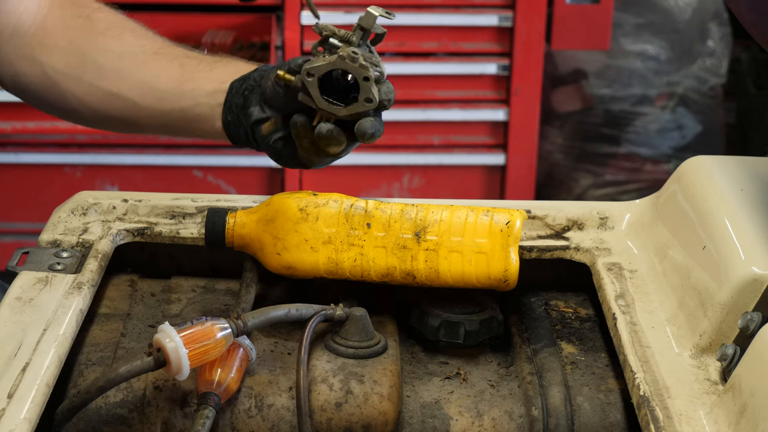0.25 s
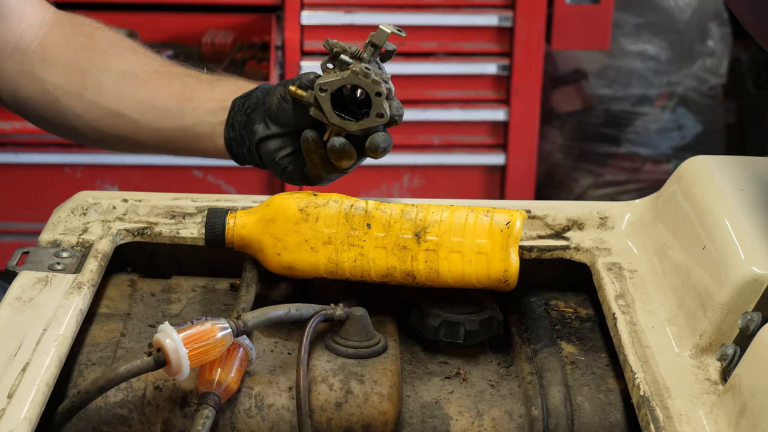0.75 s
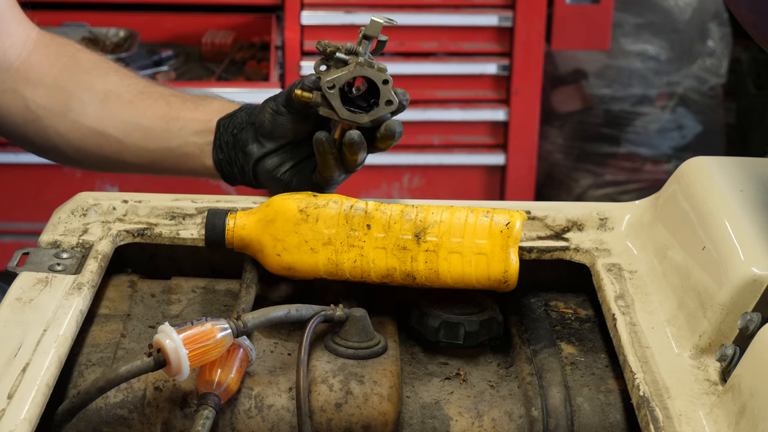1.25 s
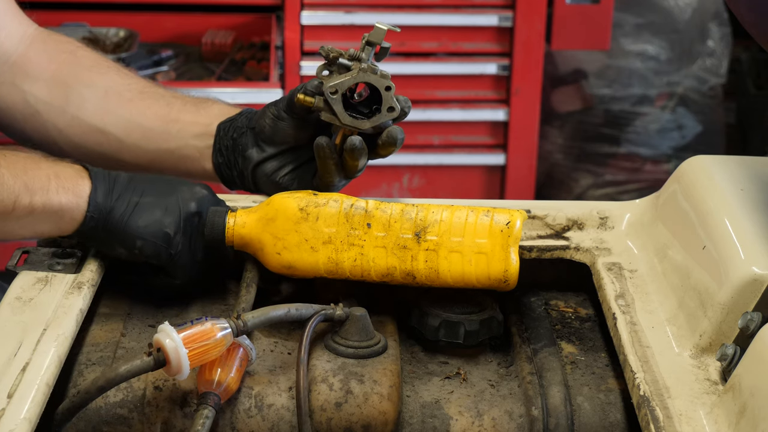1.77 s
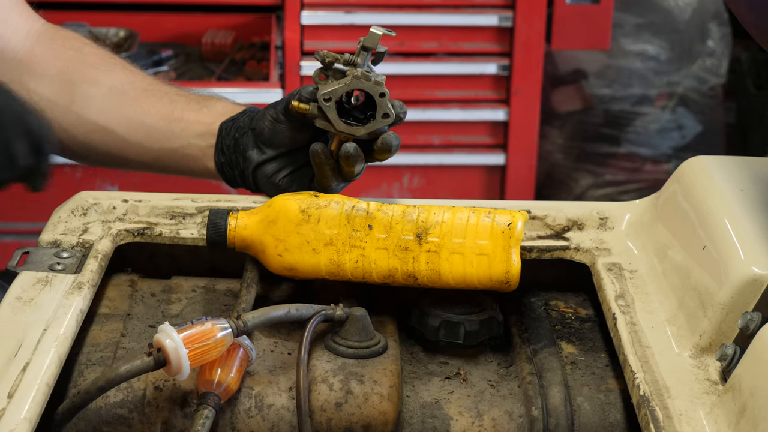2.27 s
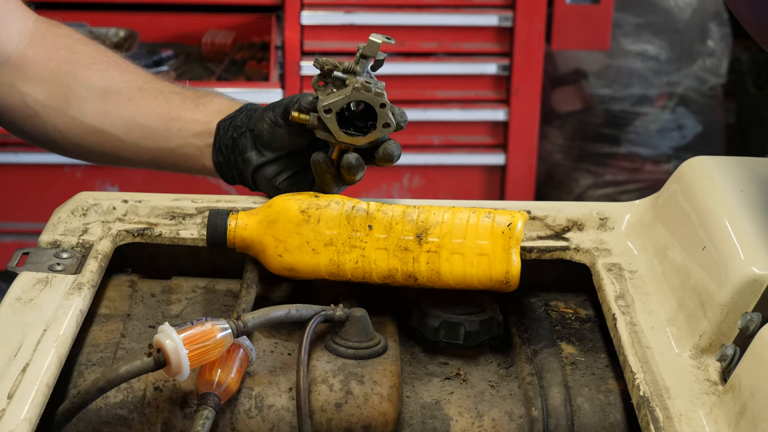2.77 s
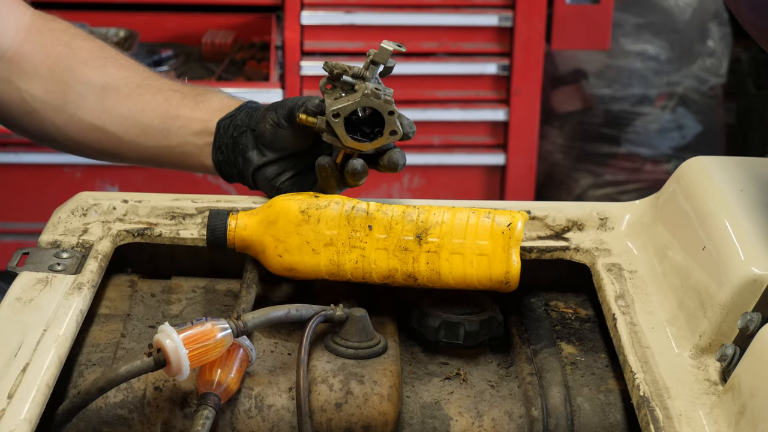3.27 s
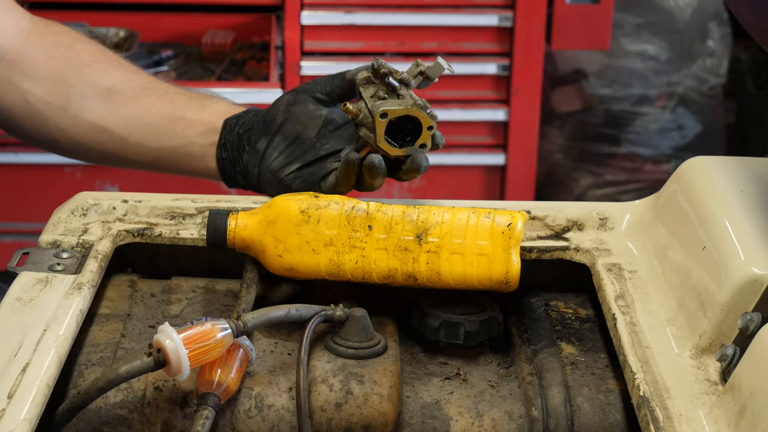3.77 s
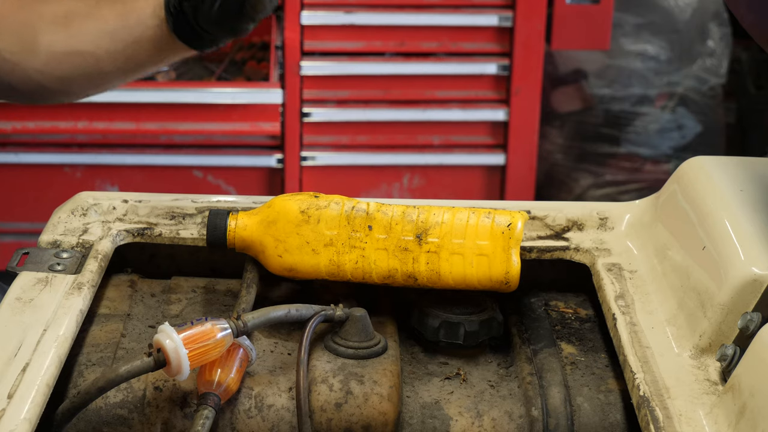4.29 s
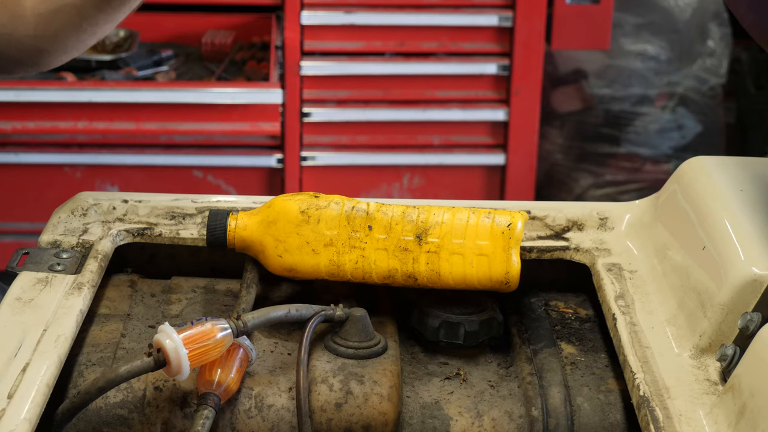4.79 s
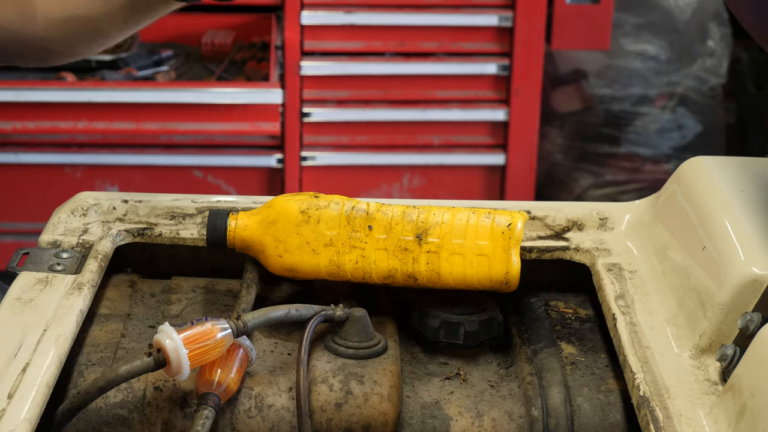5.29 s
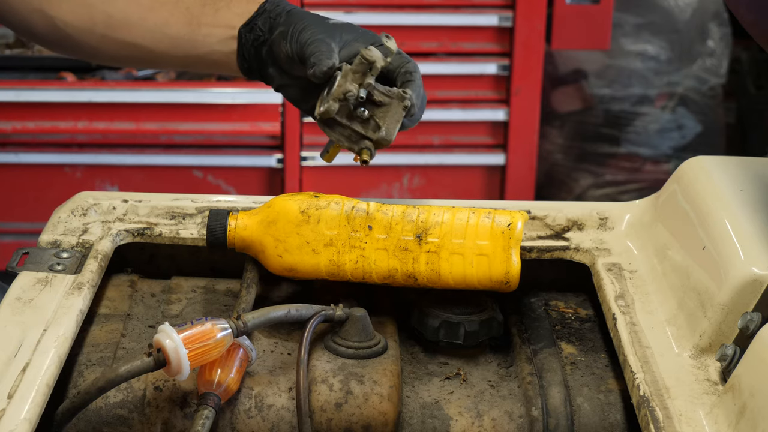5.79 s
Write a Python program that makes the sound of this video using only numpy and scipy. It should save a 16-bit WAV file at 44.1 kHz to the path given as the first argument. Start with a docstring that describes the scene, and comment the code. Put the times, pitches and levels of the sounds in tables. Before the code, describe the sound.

A workshop with its door open, close microphone, soft low hum throughout. Tiny bright screw ticks come at 0.06 to 0.26 s, the last clearest. At 0.4 s a tool is laid down with a hard clack and smaller knocks, then again at 0.6 s with a hollow plastic thump. Gloves begin to rustle faintly. At 1.28 s a clip snaps, extremely sharp and loud, followed by low hull thumps; a stronger, boomy one lands at 1.8 s among rubbery scrapes lasting to 2.3 s. After a lull, at 2.9 s a steel part clinks and bounces twice, ringing high, with a linkage tap and dull thump. Glove strokes rub softly from 3.2 s, with very faint knocks near 4 s. Distant birds, first heard faintly around 1.5 s, whistle more often after 3.4 s. At 5.4 to 5.6 s gloves scrape and the linkage rattles, strongest at the end; rustling and birds continue to 6 s.

```python
"""Workshop, door open: gloved hands strip a carburetor over a hollow plastic hull, close to the microphone.
Screw ticks come first, then a tool is laid down on the hull; gloves start to rustle, a clip snaps, the hull thumps.
Birds whistle far away from then on, a steel part clinks and bounces, and late on the linkage rattles.
Struck things are decaying sine modes with noise bursts; gloves are shaped noise, birds blurred sines.
The room hums quietly throughout and returns sparse reflections of all but the gloves and the hum."""
import sys
import numpy as np
from scipy import signal
from scipy.fft import rfft, irfft
from scipy.io import wavfile
from scipy.ndimage import uniform_filter1d

SR = 44100
rng = np.random.default_rng(int(sys.argv[2]) if len(sys.argv) > 2 else 0)


def unload_audio(sound):
    """Save the sound as a 16-bit wav file, at the path given as the first command line argument."""
    columns = np.transpose(np.atleast_2d(sound))
    # keep every value between -1 and 1, then stretch to whole-number steps
    steps = np.round(np.clip(columns, -1, 1) * 32767)
    wavfile.write(sys.argv[1], SR, steps.astype(np.int16))


N = 266628  # length in samples


def gain_of(db):
    """Decibels to amplitude."""
    return 10 ** (np.asarray(db) / 20)


def evened(x):
    """Scales to rms 1."""
    return x / np.sqrt(np.mean(x ** 2) + 1e-20)


def read(points, hz):
    """Interpolates a table of values on a log-frequency axis."""
    f, value = np.transpose(points)
    return np.interp(np.log(hz + 1), np.log(f + 1), value)


def add(mix, s, sound):
    """Mixes a sound in at s seconds."""
    part = mix[round(s * SR):][:len(sound)]
    part += sound[:len(part)]


def coloured(spectrum, patchy_db, size):
    """Noise of rms 1 with a given spectrum, whose level drifts in patches of time and frequency."""
    frames, hz = 4 * N // size + 5, np.fft.rfftfreq(size, 1 / SR)
    real, imaginary, patches = rng.standard_normal((frames, len(hz), 3)).T
    patches = uniform_filter1d(patches, size // 64, 0)  # smooth across frequency
    patches = evened(uniform_filter1d(patches, 8192 // size, 1))  # and across time
    level_db = read(spectrum, hz)[:, None] + patchy_db * patches
    frames_of_noise = (real + 1j * imaginary) * gain_of(level_db)
    return evened(signal.istft(frames_of_noise, nperseg=size, noverlap=3 * size // 4)[1][:N])


# Hum and hiss of the room, spectrum shape: f/Hz, relative level/dB per Hz
AIR_SPECTRUM = [(12, -26.5), (30, -7.5), (58, 7), (80, -4), (110, -3), (180, -8.5), (215, -13.5), (282, -4),
                (320, -13.5), (800, -20.5), (1070, -17), (1400, -27), (3500, -32.5), (16300, -41.5)]
# Faint steady tone in the room: f/Hz, level/dB rms
THIN_TONE = [(12026, -94.5)]


def air():
    """Room background: noise strongest in the bass, plus one thin steady sine."""
    t = np.arange(N) / SR
    tone = sum(gain_of(db) * np.sqrt(2) * np.sin(2 * np.pi * hz * t) for hz, db in THIN_TONE)
    return gain_of(-51) * coloured(AIR_SPECTRUM, patchy_db=0.34, size=4096) + tone


# Far whistles: start t/s, length t/s, first pitch f/Hz, level/dB rms before the swell, blur f/Hz
BIRD_WHISTLES = [(1.447, .16, 2640, -73.5, 30), (3.407, 0.25, 3924, -70, 40), (3.586, 0.075, 2370, -67, 40),
                 (3.891, 0.29, 3856, -67, 40), (4.108, 0.12, 2498, -67.5, 60), (4.2, 0.065, 2220, -73, 60),
                 (4.24, 0.098, 2480, -72, 60), (4.278, 0.64, 3238, -65, 158),
                 (4.27, 0.09, 2930, -69.5, 100), (4.756, 0.12, 2402, -67.5, 199),
                 (4.894, 0.31, 5730, -72.5, 70), (5.26, 0.13, 2470, -73.5, 60.6),
                 (5.314, 0.093, 2337, -64, 150), (5.616, 0.087, 2294, -59.5, 39.8),
                 (5.818, .07, 2130, -63, 220), (5.859, 0.043, 3540, -62, 250),
                 (5.937, 0.065, 1850, -57.5, 250), (5.92, 0.1, 2470, -65, 300)]


def birds():
    """Near-sine whistles, blurred by trills and the echoes of a long way outdoors."""
    sag_per_s = 0.018  # share of the pitch lost in a second
    early = 0.67  # under 1: a whistle peaks early and fades slowly
    steady = 0.54  # steady tone against the blur
    out = np.zeros(N)
    noises = rng.standard_normal((len(BIRD_WHISTLES), SR, 2))
    for (start, length, hz, db, blur_hz), noise in zip(BIRD_WHISTLES, noises):
        t = np.arange(int(length * SR)) / SR
        b, a = signal.butter(2, blur_hz / 2, fs=SR)
        blur = signal.lfilter(b, a, noise[:, 0] + 1j * noise[:, 1])[-len(t):]
        turns = hz * (t - sag_per_s * t ** 2 / 2)
        tone = ((steady + blur / np.std(blur)) * np.exp(2j * np.pi * turns)).real
        swell = np.sqrt(np.sin(np.pi * (t / length) ** early))
        add(out, start, gain_of(db) * evened(tone) * swell)
    return out


# Decay of the workshop's reflections: f/Hz, t60/s
SHOP_DECAY = [(150, 0.89), (600, 0.2), (2000, .35), (5000, .28), (10000, 0.37), (15000, 0.13)]


def shop(x):
    """Sparse reflections of random sign, each band dying at its own speed."""
    taps = np.zeros(SR // 2)
    at = np.arange(180, len(taps) - 20, 20)  # one tap in every 20 samples, about 4 ms late at the earliest
    taps[at + rng.integers(0, 20, len(at))] = rng.choice([-1., 1.], len(at))
    hz, t, z = signal.stft(taps, SR, nperseg=128)
    decay = gain_of(-60 * t / read(SHOP_DECAY, hz)[:, None])
    tail = signal.istft(z * decay, SR, nperseg=128)[1]
    return signal.fftconvolve(x, tail / np.linalg.norm(tail))[:N]


# Spectrum shapes of the gloves' hiss, low scrape and high fizz: f/Hz, relative level/dB per Hz
HISS_SPECTRUM = [(2500, -2), (3600, -5), (4900, 7), (5600, 0), (7200, 2.5), (9000, -8)]
SCRAPE_SPECTRUM = [(300, 4), (800, -1.5), (1300, 0.5), (1900, -0.5), (2500, -7.5), (3300, -7),
                   (5000, -18.5)]
FIZZ_SPECTRUM = [(5500, -44.5), (7500, -5.5), (9000, 0.5), (11500, -0.5), (14000, -15), (16300, -37.5)]
# Rubbing strokes: peak t/s, hiss level/dB, swell t/s and fade t/s (each over 20 dB),
# scrape level/dB and fizz level/dB against the hiss
GLOVE_STROKES = [(.695, -67, 0.088, 0.18, 14, 6.5), (.88, -70.5, 0.19, 0.054, 12.5, 3),
                 (1.032, -65.5, 0.19, 0.12, 0, -0.5), (1.24, -58.5, 0.045, 0.037, 0, 0.5),
                 (1.701, -50.5, 0.079, 0.031, 0.8, 0), (1.794, -53.5, 0.049, 0.19, 12.5, 6),
                 (1.946, -56, .07, 0.13, -4, -1), (2.018, -56.5, 0.043, 0.097, 5.5, 3),
                 (2.205, -50, 0.1, 0.021, 8, 4.5), (2.29, -63.5, .15, .25, 0, -5.3),
                 (3.165, -58.5, 0.012, 0.21, 4, -7.5), (3.255, -59, 0.064, 0.042, 5, -8),
                 (3.402, -54, 0.19, 0.14, 6, -10), (3.708, -56.5, 0.089, 0.035, -12.5, 1.5),
                 (3.79, -64, .1, 0.11, -3, -1.5), (4.07, -68, .12, .06, 1, 1),
                 (4.2, -62.5, 0.11, 0.19, -13.5, -7), (4.53, -76.5, .1, .07, -8, 8),
                 (4.725, -73.5, 0.011, .012, -5.5, 11), (4.94, -66, 0.097, .2, -22.5, -8),
                 (5.11, -66.5, 0.068, 0.21, -14, 3.5), (5.33, -63.5, .3, 0.6, -3.5, -13),
                 (5.452, -58, 0.012, 0.059, 12.5, -15), (5.57, -49.5, 0.086, .04, 6.5, -17),
                 (5.608, -49, 0.017, 0.05, 10, -28), (5.83, -61.5, 0.36, 0.23, 0.5, -4.5),
                 (6.03, -61.5, 0.26, 0.14, 7, 3)]


def gloves():
    """Rubber slips on metal and plastic: grainy hiss, low scrape and high fizz swell and fade together."""
    round_s = 0.0088  # the hand rounds off the peak of each stroke
    t, power = np.arange(N) / SR, np.zeros((3, N))
    for s, hiss_db, swell_s, fade_s, scrape_db, fizz_db in GLOVE_STROKES:
        stroke = gain_of(-20 * np.where(t < s, (s - t) / swell_s, (t - s) / fade_s))
        layer_db = [[hiss_db], [hiss_db + scrape_db], [hiss_db + fizz_db]]
        power += (gain_of(layer_db) * stroke) ** 2
    level = np.sqrt(abs(uniform_filter1d(power, int(round_s * SR) + 1, axis=1)))
    wander = evened(uniform_filter1d(rng.standard_normal(N), 150))
    slips = evened(gain_of(0.9 * wander))  # the grain shared by all three layers
    spectra = (HISS_SPECTRUM, SCRAPE_SPECTRUM, FIZZ_SPECTRUM)
    layers = [coloured(spectrum, patchy_db=1.5, size=512) for spectrum in spectra]
    return slips * (level * layers).sum(0)


def struck(blows, modes, grit_db, wide_db, grit_s, clatter_db, clatter_s, rise_s):
    """Each blow rings the modes near its contact colour, throws a wide burst of grit and leaves a dense clatter."""
    out, t = np.zeros(N), np.arange(SR // 2) / SR
    hz, db, t60 = np.transpose(modes)[:, :, None]
    side = (-1.) ** (np.arange(len(hz)) // 2)[:, None]  # neighbouring pairs of modes start in opposite directions
    bins = np.fft.rfftfreq(len(t), 1 / SR) + 1
    thin = bins ** 2 / (bins ** 2 + hz.min() ** 2)  # the grit is thinned out below the lowest mode
    contact = gain_of(-60 * t / grit_s)
    clatter = gain_of(clatter_db - 60 * t / clatter_s)  # countless small modes outlast the contact
    rise = 1 - np.exp(-t / rise_s)
    noises = rng.standard_normal((len(blows), len(t)))
    for (s, peak_db, colour_hz, focus_db, length), noise in zip(blows, noises):
        reach_db = -focus_db * np.log2(hz / colour_hz) ** 2
        level = gain_of(db + reach_db - 60 * t / (t60 * length))
        ring = (level * side * np.sin(2 * np.pi * hz * t)).sum(0)
        colour = gain_of(-wide_db * np.log2(bins / colour_hz) ** 2)
        grit = evened(irfft(rfft(noise) * thin * colour, len(t)))
        sound = ring / abs(ring).max() + gain_of(grit_db) * (contact + clatter) * grit
        add(out, s, gain_of(peak_db) * sound * rise)
    return out


# In every blow table below: t/s, ring peak level/dB before the rise, contact colour f/Hz,
# focus/dB per octave squared, factor on the ring's t60
# In every mode table below: f/Hz, relative level/dB, t60/s
# Linkage taps, then the modes of the linkage
TAP_BLOWS = [(2.9025, -16.5, 3550, 22, 0.85), (3.384, -39.5, 4600, 8.8, 0.84), (3.704, -42, 5120, 7, .6),
             (5.27, -48, 1995, 6, 0.39), (5.412, -40, 2360, 23, .73), (5.445, -33.5, 4100, 31, 1.2),
             (5.459, -34.5, 3800, 63, 1.3), (5.503, -34.5, 2780, 140, 1.7), (5.553, -29, 2970, 8.6, 1.1),
             (5.5685, -17.5, 3800, 3.9, 1.27), (5.6058, -16, 4570, 0.86, 0.66)]
LINKAGE_MODES = [(900, -9, .025), (1443, -8, .04), (2000, -6, .035), (2330, -7, .045), (2780, -3, .05),
                 (3170, -6, .04), (3480, -6, .035), (3600, -6, .06), (3850, -6, .03), (5250, -4, .03),
                 (5500, -2, .04), (5750, -4, .03), (9600, -5, .012), (11500, -9, .012)]


def linkage():
    """The linkage rattles: short modes under strong grit, with a soft rise."""
    return struck(TAP_BLOWS, LINKAGE_MODES, grit_db=-4.5, wide_db=3.0, grit_s=0.008,
                  clatter_db=-13.5, clatter_s=0.068, rise_s=0.0012)


# Touches of the steel part, landing and two bounces: t/s, tick level/dB, tick colour f/Hz
STEEL_TOUCHES = [(2.884, -28.5, 10950), (2.9245, -34, 9100), (2.954, -45, 9000)]
# Modes of the steel part: f/Hz, t60/s, landing level/dB, step/dB at first bounce, step/dB at second
STEEL_MODES = [(6810, 0.53, -21.5, 0, -2), (7700, 0.21, -41.5, 19.5, 11.5), (11800, .14, -28, .5, -3),
               (11640, 0.23, -26, 14.5, -5), (12952, 0.38, -23.5, 1.5, -8), (13886, 0.47, -36, .5, 0)]


def steel():
    """Free modes ring on through two bounces, each sharing out the ring anew; every touch adds a tick."""
    out, t = np.zeros(N), np.arange(SR) / SR
    touches = np.transpose(STEEL_TOUCHES)[0]
    bounces = (touches - touches[0])[1:, None]
    since = np.clip((t - bounces) / 0.0039, 0, 1)  # each level step takes 3.9 ms
    ring = np.zeros(SR)
    for hz, t60, db, *steps_db in STEEL_MODES:
        level = gain_of(db - 60 * t / t60 + np.dot(steps_db, since))
        ring += level * np.sin(2 * np.pi * hz * t)
    add(out, touches[0], ring * (1 - np.exp(-t / 0.00026)))
    for (s, db, hz), noise in zip(STEEL_TOUCHES, rng.standard_normal((len(touches), 800))):
        b, a = signal.butter(1, [0.69 * hz, 1.1 * hz], "band", fs=SR)
        tick = evened(signal.lfilter(b, a, noise))
        add(out, s, gain_of(db - 60 * t[:800] / 0.028) * tick)
    return out


# Hull thumps, then the modes of the hollow plastic hull
THUMP_BLOWS = [(.4062, -27.5, 300, 6, 0.196), (.5962, -15.5, 350, 4.7, 0.27), (1.281, -33, 300, 2.7, 0.74),
               (1.3385, -16.5, 335, 1.4, 0.5), (1.412, -19.5, 135, 13, .45), (1.459, -24, 124, 8.9, 0.57),
               (1.51, -32.5, 120, 9.2, 0.93), (1.719, -34, 161, 8.2, 0.64), (1.778, -23.5, 196, 7, 1),
               (1.8045, -5.5, 400, 2.6, 0.53), (1.91, -18, 173, 10, 0.25), (1.998, -25, 182, 6.6, 0.17),
               (2.214, -41, 862, 10, 0.51), (2.8815, -20, 454, 6, 0.49), (3.262, -33.5, 135, 9.5, 0.58),
               (3.41, -41.5, 126.8, 9.7, 1), (3.62, -45.5, 119.5, 10, 0.38), (4.278, -42, 118, 8, .9)]
HULL_MODES = [(112.4, -4, 0.29), (123.9, -2.5, 0.84), (182, -9, 0.26), (248, 3, 0.069), (285, -13.5, 0.079),
              (422.4, -4.5, 0.27), (478, 3.5, 0.052), (656, 13, 0.032), (840, -2, 0.022), (1290, -24, 0.31)]


def hull():
    """The hollow hull thumps: low modes, with long grit and clatter."""
    return struck(THUMP_BLOWS, HULL_MODES, grit_db=-13, wide_db=3.5, grit_s=0.069,
                  clatter_db=-7, clatter_s=0.31, rise_s=0.00074)


# Screw ticks, then the modes of the screw
TICK_BLOWS = [(.0578, -35, 2980, 3, 0.18), (.0742, -33, 5000, 1.5, 0.1), (.2214, -44, 4740, 2, 0.14),
              (.2409, -48.5, 5000, 1.5, 0.24), (.2598, -20.5, 6500, 5.5, .55)]
SCREW_MODES = [(1940, 9, 0.031), (6800, 4, 0.045), (6700, -34, .2), (7504, -8, 0.068), (8760, 3, 0.013),
               (13100, -24.5, 0.027)]


def screw():
    """The screw ticks: small bright modes, with grit that grows away from the contact colour."""
    return struck(TICK_BLOWS, SCREW_MODES, grit_db=-14, wide_db=-1.1, grit_s=0.021,
                  clatter_db=-18.5, clatter_s=0.064, rise_s=0.00016)


# Tool knocks, then the modes of the tool
KNOCK_BLOWS = [(.4055, -8, 1930, 2.95, 0.51), (.4097, -1.7, 2040, 4.5, 0.34), (.4398, -11.5, 800, 11, 1.4),
               (.4715, -44, 1900, 7.2, .7), (.494, -27, 760, 7.8, 1.1), (.5958, -8, 2364, 9.1, 0.54),
               (.6055, -12, 600, 4, 1.3), (.652, -27, 600, 5.7, 0.42), (4.0245, -44, 1770, 5, 0.61),
               (4.2065, -37, 1190, 4.4, .35)]
TOOL_MODES = [(450, -8, .05), (635, -5, .05), (750, -4, .08), (810, -7, .05), (953, -8, .05),
              (1200, -8, .04), (1350, -8, .03), (1500, -6, .03), (1669, -3, .04), (1870, -4, .03),
              (2160, -3, .03), (2350, -3, .025), (2550, -4, .02), (4600, -14, .012), (7300, 14, .005),
              (9200, 19, .004), (11500, 24, .004)]


def tool():
    """The tool is laid down: many short modes, with grit close to the contact colour."""
    return struck(KNOCK_BLOWS, TOOL_MODES, grit_db=-11, wide_db=6.5, grit_s=0.012,
                  clatter_db=-19, clatter_s=0.065, rise_s=0.00007)


SNAP_BURSTS = [(1.2797, 3, 10000, 1, 0.33), (1.2803, 2.5, 9830, 0.84, 1)]
CLIP_MODES = [(1500, -22, .02), (1620, -19, .035), (8300, -11, .006), (9300, -5, .009), (9800, -2, .011),
              (11200, -5, .006), (12400, -5, .005), (13600, -8, .004)]


def clip():
    """The clip snaps once, sharply, as two overlapping bursts: very short treble modes, a faint long clatter."""
    return struck(SNAP_BURSTS, CLIP_MODES, grit_db=-20.5, wide_db=2.5, grit_s=0.0027,
                  clatter_db=-13, clatter_s=0.21, rise_s=0.0001)


def scene():
    """Every source with its own share of the room, over gloves and air."""
    # source, level into the room/dB
    things = [(birds(), -3), (linkage(), -12), (steel(), -18), (hull(), -11),
              (screw(), -14), (tool(), -9), (clip(), -21)]
    near = sum(x for x, room_db in things)
    far = shop(sum(gain_of(room_db) * x for x, room_db in things))
    return (near + far + gloves() + air())[None]


def record(dry):
    """Cuts peaks flat at full scale, then limits the band with a linear-phase low-pass."""
    edge_hz = 16000
    lowpass = signal.firwin(255, edge_hz, window=("kaiser", 9), fs=SR)
    return signal.oaconvolve(np.clip(dry, -1, 1), lowpass[None], "same")


dry = scene()
out = record(dry)
unload_audio(out)
```